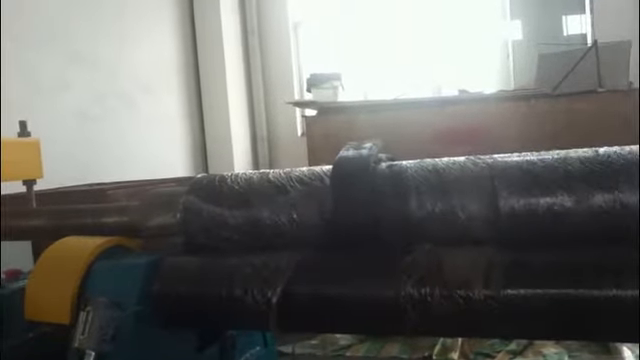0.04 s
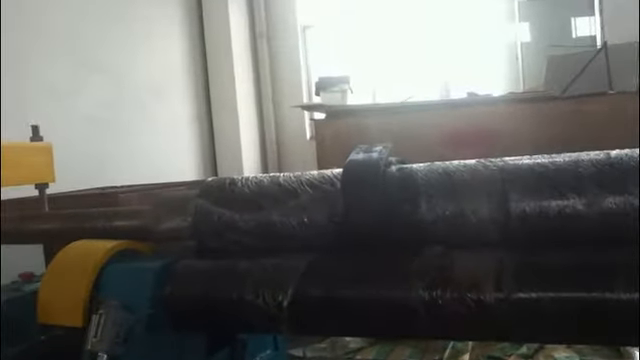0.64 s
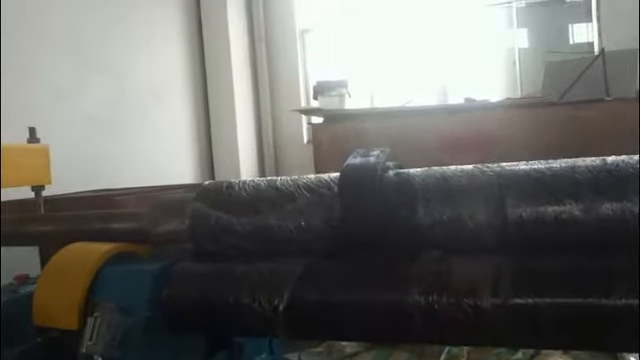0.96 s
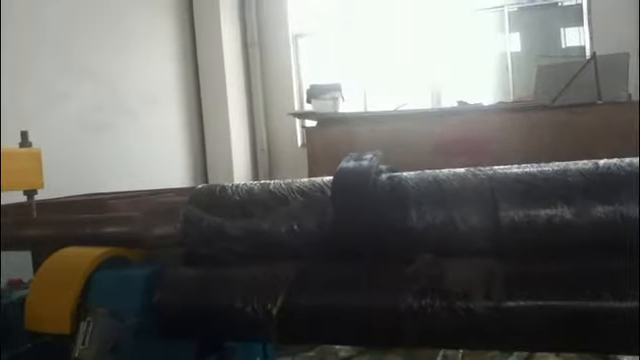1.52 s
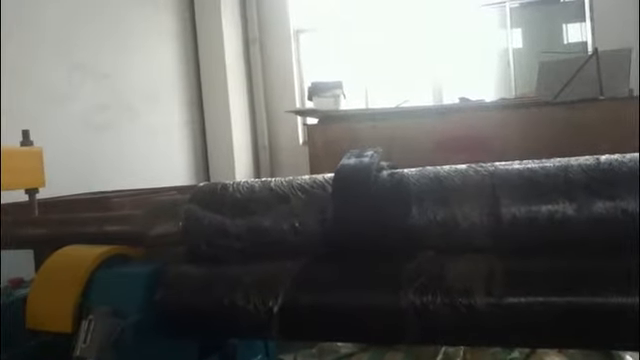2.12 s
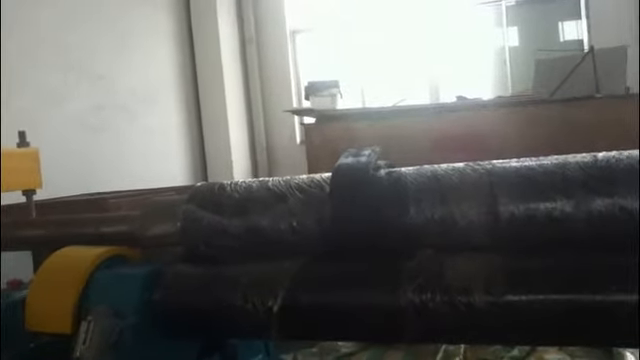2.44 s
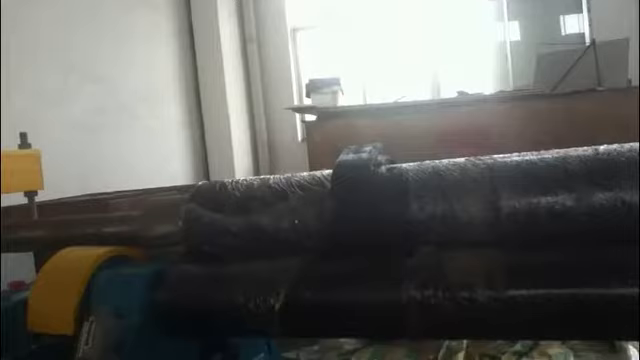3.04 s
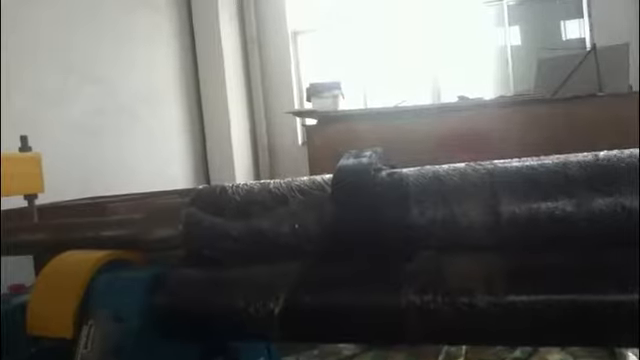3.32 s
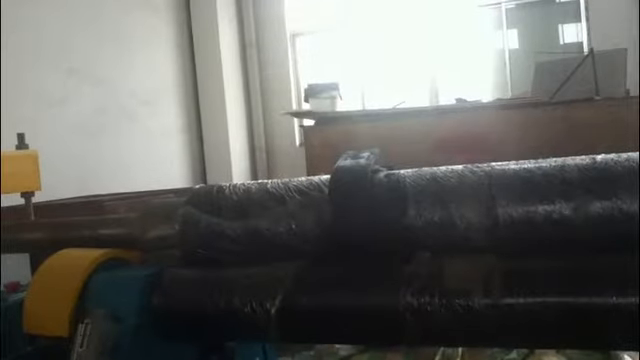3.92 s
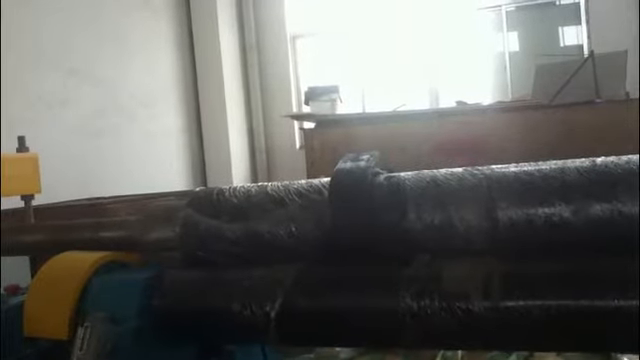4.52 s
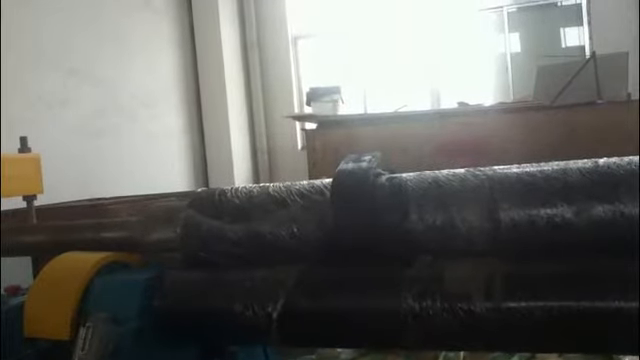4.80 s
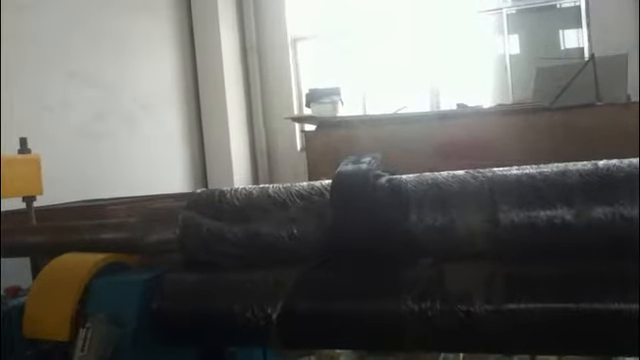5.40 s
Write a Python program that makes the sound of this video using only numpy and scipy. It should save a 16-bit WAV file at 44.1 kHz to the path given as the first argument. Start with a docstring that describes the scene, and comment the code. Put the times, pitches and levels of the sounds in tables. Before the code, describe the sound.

After a brief workshop hum, a heavy drive bangs into motion and keeps rumbling, its gears whining as steel rollers grind and crackle.

```python
"""A plate-rolling machine starts up

A workshop hums quietly. The drive takes up its slack with a crash, then runs steadily.
Its gears growl and sing in the steel frame. The fast shaft knocks twice a turn, the slow wheel
runs tight twice a turn, and now and then the plate binds (sticks), so the machine works harder.
The rolls grind on the plate, and grit and flakes tick between them."""
import sys
import numpy as np
from scipy import signal
from scipy.fft import rfft, irfft, next_fast_len
from scipy.io import wavfile
from scipy.ndimage import uniform_filter1d

SR = 44100
rng = np.random.default_rng(int(sys.argv[2]) if len(sys.argv) > 2 else 0)


def persist_wave(psi):
    """Save psi, clipped to +-1, as 16-bit WAV."""
    counts = np.round(np.clip(psi, -1, 1) * 32767).astype(np.int16)
    wavfile.write(sys.argv[1], SR, np.atleast_2d(counts).T)


N = 249606
TIME = np.arange(N) / SR
RUN_S, RUN_RISE_S = 0.348, 0.025   # when the drive comes in, and how quickly
SHAFT_HZ, WHEEL_HZ = 16.665, 1.585   # turns per second
SHOP_T60_S = 0.11   # a t60 is the time a sound takes to fade by 60 dB

# Tone colour of the shop's hiss: f/Hz, relative level/dB
HISS_SPECTRUM = [(18, -65.5), (30, -40.5), (49, -22), (118, -8.5), (160, -9.5), (229, -5), (390, -4.5),
                 (586, -10.5), (3060, -24.5), (3650, -28), (3940, -28.5), (8660, -37), (13000, -68.5)]
# Tones of the shop's hum: f/Hz, relative level/dB
HUM_TONES = [(156, -37), (301.5, -34.5), (388, -35), (770, -39.5), (1540, -49.5), (2385, -51.5),
             (2821, -53.5), (3553, -51.5)]
# Scrapes and bangs of the start: t/s, rise/s, hold/s, t60/s, low f/Hz, high f/Hz, level/dB
CRASH_BURSTS = [(.319, .002, .028, .055, 1700, 7500, -21.5), (.305, .022, .016, .09, 70, 600, -19.5),
                (.316, .006, .024, .05, 7000, 12000, -36.5), (.337, .016, .012, .22, 260, 520, -22),
                (.338, .005, .013, .12, 1500, 2750, -13), (.339, .01, .008, .14, 520, 1600, -10.5)]
# Notes the steel rings with after the slam: f/Hz, level/dB, t60/s
STEEL_MODES = [(1728, -13, .3), (2143, -9, .11), (2326, -9.5, .15), (2514, -18, .16)]
# Load on the drive, easing after the start and building as the rolls bite: t/s, level/dB
DRIVE_LOAD = [(0.39, -1), (0.65, -5.5), (0.85, -3), (1.08, -3.5), (1.28, -0.9), (1.7, -0.85), (1.9, 0),
              (3.2, -0.3), (5.6, 0.56)]
# Tight spots of the slow wheel: place/turns, width/turns, strength
WHEEL_TIGHT_SPOTS = [(0.27, 0.16, 0.56), (0.873, 0.11, 0.74)]
# Moments when the plate binds: t/s, width/s, strength
PLATE_BINDS = [(2.0, 0.029, 0.69), (2.116, 0.0064, 1.5), (2.438, 0.057, 0.5), (2.66, 0.019, 0.77),
               (2.91, 0.026, 1.0), (3.11, 0.035, 0.54), (4.315, 0.02, 1.2), (4.505, 0.036, 1.4),
               (4.569, 0.025, 1.2), (4.93, 0.096, 0.98), (5.58, 0.034, 0.64)]
# Knocks in one turn of the fast shaft: place/turns, relative level/dB
SHAFT_KNOCKS = [(.09, -5), (0.656, 2)]
# Weaker tones of motor and gearbox: f/Hz, base level/dB
WEAK_GEAR_TONES = [(100, -38), (118.4, -37), (200, -33.5), (250.5, -31.5), (267, -29), (680, -39.5),
                   (1110, -32.5), (1235, -33.5), (1446, -38), (1725, -42), (2858, -48.5)]
# Strongest gear tones: f/Hz, pitch wander/Hz, base level/dB, surge lift/dB, surge width/s, surges t/s
STRONG_GEAR_TONES = [(303.7, 1.98, -29.5, 9, 0.084, (0.45, 0.85, 1.01, 1.25, 2.0, 2.22, 2.44, 2.77, 3.19, 3.64, 4.42, 4.58, 4.96, 5.15, 5.39)),
                     (388.1, 3.09, -29.5, 8, 0.033, (0.4, 1.61, 2.02, 2.32, 2.64, 2.91, 3.93, 4.3, 5.1, 5.54)),
                     (419.3, 3, -28.5, 9, 0.071, (1.39, 1.6, 1.78, 2.42, 3.29, 3.93, 4.46, 4.8, 5.21)),
                     (557, 6, -29, 8.5, 0.052, (1.26, 1.58, 1.78, 1.879, 2.76, 3.09, 3.4, 3.92, 4.12, 4.44, 4.79, 5.37)),
                     (775.6, 5.48, -30, 8.5, 0.045, (1.32, 1.86, 2.16, 2.77, 3.51, 3.8, 4.22, 4.64, 4.9, 5.18, 5.6)),
                     (838, 3, -33.5, 10, 0.065, (0.46, 1.54, 2.5, 2.941, 3.32, 3.75, 3.87, 4.02, 4.08, 4.58, 5.2, 5.48)),
                     (1611, 3.64, -35.5, 10.5, 0.034, (2.11, 2.24, 2.52, 3.35, 4.59, 4.9, 5.25, 5.3)),
                     (2139, 4.01, -36.5, 9.5, 0.045, (2.41, 2.47, 2.68, 3.09, 3.14, 5.03, 5.59))]
# Peaks and dips that the frame and guards add to a sound: f/Hz, width/Hz, lift/dB
FRAME_RESONANCES = [(210, 14.6, 6), (326, 58, -7), (410, 120, 3), (502.5, 16, -10.5), (556, 105, 8),
                    (756, 8.3, -23.5), (1173, 12, -17.5), (1553, 130, -7), (1628, 130, 7), (1843, 84, -4.5),
                    (1960, 68, 5), (1983, 16, -8.5), (2113, 61, 6), (2300, 34, 0), (2475, 62, 5)]
# Tone colours of the gears, the rolls and a cracking flake: f/Hz, relative level/dB
RUMBLE_SPECTRUM = [(20, -45.5), (45, -37.5), (65, -19), (88, -23.5), (105, -10.5), (150, -6.5), (200, -4),
                   (280, 3), (450, -1.5), (650, -8), (800, -7.5), (2000, -96.5)]
CLATTER_SPECTRUM = [(300, -71.5), (600, -1), (780, 4.5), (1100, 3), (1450, 1), (1900, -5.5), (5000, -78)]
GRINDING_SPECTRUM = [(900, -27), (1500, -1), (2100, -1), (2750, -2), (3050, -11), (3600, -13), (6000, -27),
                     (10000, -73.5)]
GRIT_SPECTRUM = [(1500, -21.5), (3000, -25), (3900, 12.5), (4150, 1.5), (4360, 14.5), (4650, 7.5),
                 (5200, 8.5), (6200, 4.5), (8100, -3.5), (8800, -34.5), (13000, -68)]
CRACK_SPECTRUM = [(1000, -13), (2100, 2.5), (2600, 8.5), (3300, -27), (3900, 2), (4400, -9.5), (5300, 5),
                  (6200, -4), (8000, -7), (10000, -38.5), (13000, -54)]
# The loudest flakes cracking between the rolls: t/s, relative level/dB
BIG_FLAKES = [(0.568, -31.5), (0.614, -29.5), (0.636, -29.5), (0.758, -25), (1.02, -34.5), (1.063, -27.5),
              (1.181, -33), (1.243, -27.5), (1.273, -26), (1.297, -24.5), (1.361, -27), (1.42, -26.5),
              (1.445, -26.5), (1.537, -31), (1.6, -27), (1.661, -22.5), (1.844, -26), (2.023, -24.5),
              (2.113, -28), (2.139, -20), (2.378, -23), (2.417, -27), (2.439, -23), (2.504, -26.5),
              (2.562, -30), (2.624, -30.5), (2.802, -28.5), (2.966, -25.5), (3.039, -33), (3.104, -30.5),
              (3.23, -24), (3.26, -21.5), (3.365, -17), (3.401, -22.5), (3.545, -19), (3.668, -21.5),
              (3.821, -24.5), (4.022, -23.5), (4.057, -35.5), (4.208, -20.5), (4.268, -31), (4.297, -28),
              (4.333, -22.5), (4.361, -20.5), (4.449, -20.5), (4.484, -20.5), (4.785, -22), (4.866, -24.5),
              (4.899, -22), (5.162, -23.5), (5.256, -27), (5.287, -24.5), (5.384, -21), (5.41, -24.5),
              (5.588, -24.5)]
# How each noise follows the load: full-load level/dB, dB per dB of load, tight lift/dB, bind lift/dB
RUMBLE_RESPONSE = (-18.5, 1.02, 0.36, 0.5)
CLATTER_RESPONSE = (-19, 0.85, 2.5, 3.5)
GRINDING_RESPONSE = (-25, 1.22, 2, 2)


def from_db(db):
    """Turn decibels into a number to multiply by."""
    return 10 ** (np.asarray(db) / 20)


def rms_one(x):
    """Scale a signal so that its average power is 1."""
    return x / np.sqrt(np.mean(np.abs(x) ** 2) + 1e-20)


def drift(rate_hz):
    """A smooth random wobble of typical size 1; a higher rate wobbles faster."""
    step = 40   # samples between points
    pole = np.exp(-2 * np.pi * rate_hz * step / SR)
    noise = rng.standard_normal(N // step + 2002)
    slow = signal.lfilter([1], [1, -2 * pole, pole * pole], noise)[2000:]
    return np.interp(np.arange(N) / step, np.arange(len(slow)), rms_one(slow))


def coloured(x, spectrum, resonances=()):
    """Give a sound a tone colour, with peaks and dips on top; its power comes out as 1."""
    size = next_fast_len(N)
    hz = np.maximum(np.arange(size // 2 + 1) * SR / size, 1)
    points = np.array(spectrum)
    db = np.interp(np.log(hz), np.log(points[:, 0]), points[:, 1])
    for centre, width, lift in resonances:
        db = db + lift / (1 + (2 * (hz - centre) / width) ** 2)
    return rms_one(irfft(rfft(x, size) * from_db(db), size)[:N])


def band(x, low_hz, high_hz):
    """Let through mainly what lies between two frequencies."""
    return signal.sosfilt(signal.butter(2, [low_hz, high_hz], "band", fs=SR, output="sos"), x)


def tone(hz, flutter_hz, steady):
    """A tone with a steady core and a part that wavers at random."""
    wander = steady + (drift(flutter_hz) + 1j * drift(flutter_hz)) / np.sqrt(2)
    return rms_one(np.real(wander * np.exp(2j * np.pi * hz * TIME)))


def shop_hum(running, hiss_db=-28, fade_db_per_s=-18, sink_db=-22):
    """The shop hums and hisses: the hum ebbs, and both sink back once the drive runs."""
    hiss = from_db(hiss_db) * coloured(rng.standard_normal(N), HISS_SPECTRUM)
    hum = sum(from_db(db) * tone(hz, flutter_hz=9, steady=1.4) for hz, db in HUM_TONES)
    ebb = from_db(2 + fade_db_per_s * np.minimum(TIME, RUN_S))
    return (hiss + hum * ebb) * from_db(sink_db * running)


def start_crash(jolt_s=0.334, jolt_width_s=0.015, jolt_hz=205, slam_s=0.342, ring_rise_s=0.0074):
    """The motor jolts the frame, the gears scrape through their slack and slam, and the steel rings."""
    jolt = from_db(-13) * np.exp(-((TIME - jolt_s) / jolt_width_s) ** 2)
    out = jolt * np.sin(2 * np.pi * jolt_hz * TIME)
    for s, rise, hold, t60, low_hz, high_hz, db in CRASH_BURSTS:
        after_hold = np.maximum(TIME - s - rise - hold, 0)
        swell = np.clip((TIME - s) / rise, 0, 1) * from_db(db - 60 * after_hold / t60)
        # noise filtered twice stands for many ringing notes packed close together
        cluster = band(band(rng.standard_normal(N), low_hz, high_hz), low_hz, high_hz)
        out += swell * rms_one(cluster)
    t = np.maximum(TIME - slam_s, 0)
    for hz, db, t60 in STEEL_MODES:
        ring = np.minimum(t / ring_rise_s, 1) * from_db(db - 60 * t / t60)
        out += ring * np.sin(2 * np.pi * (hz * t + rng.random()))
    return shop_echo(out, echo_db=-40)


def shop_echo(x, echo_db):
    """The hall adds a short, blurred echo."""
    t = TIME[:SR // 2]
    tail = rng.standard_normal(len(t)) * from_db(-60 * t / SHOP_T60_S)
    return x + from_db(echo_db) * signal.fftconvolve(x, tail / np.linalg.norm(tail))[:N]


def level_under_load(response, load_db, wander_db=1.04, wander_hz=1.27):
    """A noise's level in dB follows the load, rises at tight spots and binds, and wanders a little."""
    full_db, follows, tight_db, bind_db = response
    tight = sum(strength * np.exp(-(((TIME * WHEEL_HZ - place + .5) % 1 - .5) / width) ** 2)
                for place, width, strength in WHEEL_TIGHT_SPOTS)
    bind = sum(strength * np.exp(-((TIME - s) / width) ** 2) for s, width, strength in PLATE_BINDS)
    return full_db + follows * load_db + tight_db * tight + bind_db * bind + wander_db * drift(wander_hz)


def gear_tones(rumble_db, grinding_db, whine_above_hz=800, whine_follows=0.75):
    """Meshing teeth sing with the effort; the higher tones flutter faster and swell with the grinding."""
    effort_db = rumble_db - np.median(rumble_db)
    whine_db = whine_follows * (grinding_db - np.mean(grinding_db))
    out = np.zeros(N)
    for hz, db in WEAK_GEAR_TONES:
        swell_db = whine_db if hz > whine_above_hz else effort_db
        out += from_db(db + swell_db) * tone(hz, flutter_hz=min(0.0097 * hz, 9), steady=1)
    return out


def gear_surges(grinding_db, follows=0.3, flicker_db=1.94):
    """The gears ring out in short surges, each tone at its own moments and wandering in pitch."""
    out = np.zeros(N)
    for hz, wander_hz, db, lift_db, width_s, times in STRONG_GEAR_TONES:
        surge = sum(np.exp(-((TIME - s) / width_s) ** 2) for s in times)
        level = from_db(db + flicker_db * drift(rate_hz=14)) * (1 + (from_db(lift_db) - 1) * surge)
        cycles = rng.random() + np.cumsum(hz + wander_hz * drift(rate_hz=9)) / SR
        out += level * np.sqrt(2) * np.sin(2 * np.pi * cycles)
    return out * from_db(follows * (grinding_db - np.mean(grinding_db)))


def contacts(per_s, spread_db):
    """Tiny hits at random times, of uneven size, each a push or a pull."""
    sizes = from_db(spread_db * np.minimum(rng.exponential(1, N), 4)) * rng.choice([-1, 1], N)
    return rms_one(sizes * (rng.random(N) < per_s / SR))


def shaft_pulse(depth, decay_s, uneven_db):
    """The load jumps at each knock of the turning shaft, then falls back."""
    knocks = sum(from_db(db) * np.exp(-((TIME * SHAFT_HZ - place) % 1) / SHAFT_HZ / decay_s)
                 for place, db in SHAFT_KNOCKS)
    uneven = from_db(uneven_db * np.tanh(drift(rate_hz=22)))
    return rms_one(1 + depth * uniform_filter1d(knocks, size=120) * uneven)


def echo_wash(x, echo_db):
    """Hits from all over the machine echo in the hall as a wash of noise that follows their power."""
    keep = from_db(-120 / (SHOP_T60_S * SR))   # share of the power left after one sample
    power = signal.lfilter([1 - keep], [1, -keep], x ** 2 + 1e-18)
    return x + from_db(echo_db) * np.sqrt(power) * rng.standard_normal(N)


def gear_noise(rumble_db, clatter_db):
    """Striking teeth shake the frame: a deep rumble, and a harder clatter that pulses with the shaft."""
    rumble = coloured(contacts(per_s=5000, spread_db=2.5), RUMBLE_SPECTRUM, FRAME_RESONANCES)
    teeth = contacts(per_s=4000, spread_db=1.5) * shaft_pulse(depth=0.38, decay_s=0.013, uneven_db=-4)
    clatter = coloured(echo_wash(teeth, echo_db=-5.5), CLATTER_SPECTRUM, FRAME_RESONANCES)
    return from_db(rumble_db) * rumble + from_db(clatter_db) * clatter


def rolls(grinding_db, grit_db=-12):
    """The rolls grind on the plate and crush its flaky crust to grit, in two bursts per shaft turn."""
    rubs = contacts(per_s=4100, spread_db=2) * shaft_pulse(depth=0.51, decay_s=0.023, uneven_db=8.5)
    grains = contacts(per_s=10000, spread_db=-0.5) * shaft_pulse(depth=1.5, decay_s=0.041, uneven_db=6)
    grinding = coloured(echo_wash(rubs, echo_db=-4), GRINDING_SPECTRUM, FRAME_RESONANCES)
    grit = coloured(echo_wash(grains, echo_db=-3.5), GRIT_SPECTRUM)
    return from_db(grinding_db) * (grinding + from_db(grit_db) * grit)


def small_flakes(load_db, chance=0.36, base_db=-32.5, spread_db=3.5):
    """Some shaft knocks crack a flake, harder under load. Gives rows of t/s, relative level/dB."""
    turns = range(int(TIME[-1] * SHAFT_HZ))
    times = np.array([(turn + place) / SHAFT_HZ for turn in turns for place, _ in SHAFT_KNOCKS])
    luck, size = rng.random((len(times), 2)).T
    db = base_db + np.interp(times, TIME, load_db) + spread_db * (2 * size - 1)
    return np.column_stack([times, db])[(luck < chance) & (times > RUN_S)]


def flake_ticks(flakes, rise_s=0.0036, hold_s=0.00177, t60=0.05, low_hz=4230, high_hz=5000):
    """Each flake crumbles with a dry crunch and a brief ring of steel, of random length and pitch."""
    cracks, rings, t = np.zeros(N), np.zeros(N), TIME[:SR // 8]
    variety = rng.random((len(flakes), 2))
    noises = rng.standard_normal((len(flakes), 2 * len(t)))
    for (s, db), (length, pitch), noise in zip(flakes, variety, noises):
        after_hold = np.maximum(t - hold_s * from_db(3 * (2 * length - 1)), 0)
        crunch = np.minimum(t / rise_s, 1) * from_db(db - 60 * after_hold / t60)
        hz = low_hz * (high_hz / low_hz) ** pitch
        ring = rms_one(band(noise, 0.93 * hz, 1.07 * hz)[len(t):])
        at = round(s * SR)
        cracks[at:at + len(t)] += (crunch * noise[:len(t)])[:N - at]
        rings[at:at + len(t)] += (crunch * ring)[:N - at]
    cracks = from_db(-6) * np.std(cracks) * coloured(cracks, CRACK_SPECTRUM)
    return shop_echo(cracks + rings, echo_db=-7.5)


def scene():
    """The shop hums, the start crashes, and the drive comes in; its sounds all follow one load."""
    load_db = np.interp(TIME, *np.transpose(DRIVE_LOAD))
    rumble_db = level_under_load(RUMBLE_RESPONSE, load_db)
    clatter_db = level_under_load(CLATTER_RESPONSE, load_db)
    grinding_db = level_under_load(GRINDING_RESPONSE, load_db)
    running = np.clip((TIME - RUN_S) / RUN_RISE_S, 0, 1)
    drive = gear_tones(rumble_db, grinding_db) + gear_surges(grinding_db)
    drive += gear_noise(rumble_db, clatter_db) + rolls(grinding_db)
    mix = running * drive + start_crash() + shop_hum(running)
    mix += flake_ticks([*BIG_FLAKES, *small_flakes(load_db)])
    return mix[None]


def record(dry):
    """The loudest peaks are rounded off, and the treble above 12700 Hz is cut."""
    rounded = dry / (1 + dry ** 8) ** (1 / 8)
    return signal.sosfilt(signal.cheby1(12, .1, 12700, fs=SR, output="sos"), rounded)


dry = scene()
out = record(dry)
persist_wave(out)
```